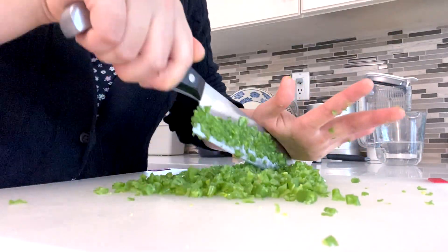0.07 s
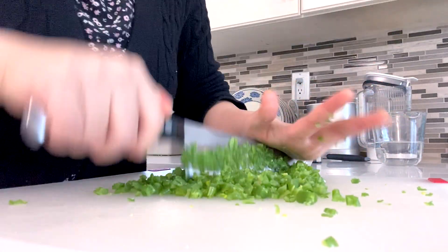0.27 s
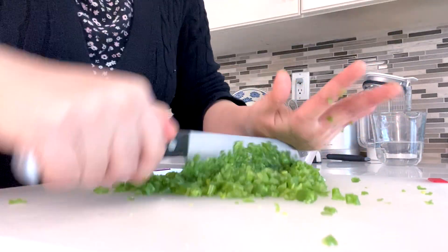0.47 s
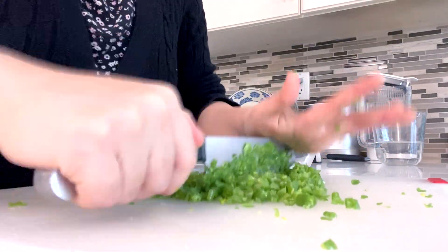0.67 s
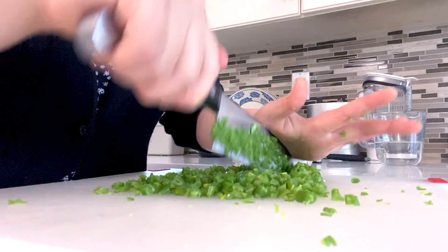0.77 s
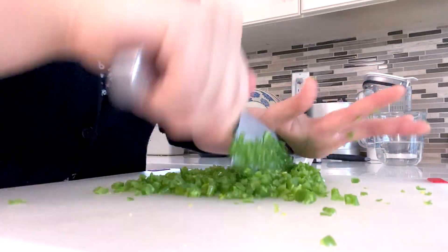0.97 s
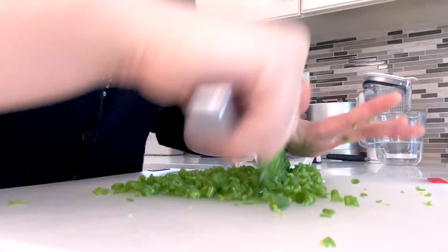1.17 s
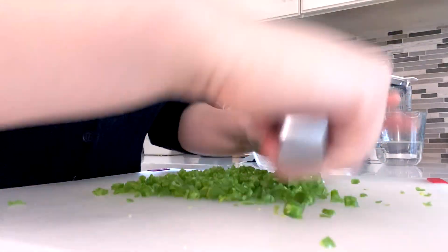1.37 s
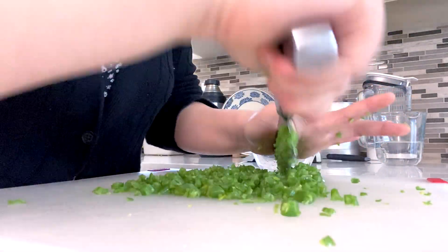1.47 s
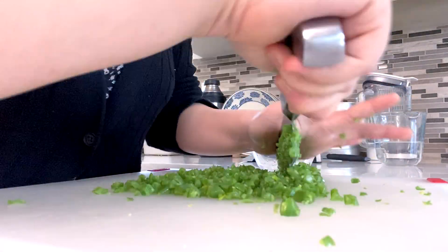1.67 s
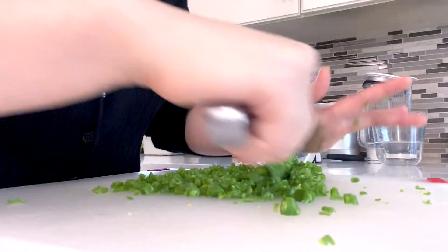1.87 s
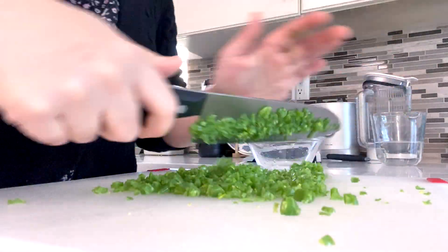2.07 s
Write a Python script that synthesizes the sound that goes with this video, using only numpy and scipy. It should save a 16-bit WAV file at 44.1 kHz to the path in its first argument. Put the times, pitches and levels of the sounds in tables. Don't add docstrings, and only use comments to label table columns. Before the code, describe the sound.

A kitchen knife minces a heap of crisp green vegetables, about four or five strokes a second, each a short crunch into a woody thud, then a board rattle; close microphone, hard tiled kitchen, faint fridge drone.

```python
import sys
import numpy as np
from scipy import signal
from scipy.fft import rfft, irfft, next_fast_len
from scipy.io import wavfile

SR = 44100
rng = np.random.default_rng(int(sys.argv[2]) if len(sys.argv) > 2 else 0)


def unload_wav(signal):
    wavfile.write(
        sys.argv[1],
        SR,
        np.round(np.clip(np.atleast_2d(signal).T, -1, 1) * 32767).astype(np.int16),
    )


def volts_from_decibels(level):
    exponent = np.asarray(level, float) / 20
    return 10 ** exponent


N = 92610
LEAD_S = 0.1
M = N + round(LEAD_S * SR)


def unit(x):
    return x / np.sqrt(np.mean(x ** 2) + 1e-20)


def along(points, hz):
    f, v = np.transpose(points)
    return np.interp(np.log(hz + 1), np.log(f + 1), v)


def filtered(x, response):
    m = next_fast_len(x.shape[-1] + 8192)
    spectrum = rfft(x, m) * response(np.fft.rfftfreq(m, 1 / SR))
    return irfft(spectrum, m)[..., :x.shape[-1]]


def coloured(x, points):
    return unit(filtered(x, lambda hz: volts_from_decibels(along(points, hz))))


def add(track, start_s, sound):
    part = track[..., round(start_s * SR):][..., :sound.shape[-1]]
    part += sound[..., :part.shape[-1]]


def ring(modes, t, rise_s, spread_db, turn):
    hz, db, t60 = np.transpose(modes)[:, :, None]
    luck = rng.standard_normal((3, len(modes), 1))
    shift = turn * luck[1] * np.minimum(hz / 600, 1)
    wave = np.sin(2 * np.pi * hz * (1 + 0.0084 * luck[2]) * t + np.array([shift, -shift]))
    level = volts_from_decibels(db + spread_db * luck[0] - 60 * t / t60)
    return (level * wave).sum(axis=1) * (1 - np.exp(-t / rise_s))


# pitch_hz, level_db
CRACK_SPECTRUM = [(800, -24), (2200, -18.5), (4200, 5.5), (6500, 2.5), (8200, 11), (11000, -12),
                  (15000, -11.5)]


def crack():
    t = np.arange(SR // 20) / SR
    return volts_from_decibels(-60 * t / 0.012) * coloured(rng.standard_normal(len(t)), CRACK_SPECTRUM)


# start_s, thud_db, crunch_length_s, crunch_db, counter_db
STROKES = [(0.2141, 1, 0.052, -17, -18), (.443, 5.5, 0.034, -16.5, -13.5),
           (0.663, -3.5, 0.051, -18.5, -3.5), (0.884, -2, 0.036, -15.5, -3.5),
           (1.099, -2.5, 0.058, -17, -5.5), (1.308, -2, 0.037, -20.5, -5.5), (1.536, -3, 0.03, -18, -5.5),
           (1.754, -1, 0.021, -15, -7)]
# start_s, level_db
SNAPS = [(0.18, -38), (.416, -37), (0.651, -23), (0.863, -28), (0.88, -23), (1.062, -24), (1.071, -21.5),
         (1.523, -34.5)]
# pitch_hz, level_db (per Hz)
CRUNCH_SPECTRUM = [(300, -20.5), (800, 1.5), (1500, -6), (2500, -7), (5000, -20), (8000, -18.5),
                   (12000, -26), (15500, -28.5)]
CRUNCH_RISE_DB, CRUNCH_T60_S = 28, 0.024
GRAINS_PER_S, GRAIN_SPREAD_DB = 5500, 6


def crunch():
    t = np.arange(N) / SR
    present = rng.random(N) < GRAINS_PER_S / SR
    size = volts_from_decibels(GRAIN_SPREAD_DB * np.minimum(rng.exponential(size=N), 2))
    grains = present * size * rng.standard_normal(N)
    level = np.zeros(N)
    for start_s, _, length_s, db, _ in STROKES:
        before = (start_s - t) / length_s
        swell = volts_from_decibels(db - CRUNCH_RISE_DB * before ** 2) * (before < 1.4)
        fade = volts_from_decibels(db - 60 * np.abs(t - start_s) / CRUNCH_T60_S)
        level += np.where(t < start_s, swell, fade)
    out = level * coloured(unit(grains) + 0.5 * rng.standard_normal(N), CRUNCH_SPECTRUM)
    for start_s, db in SNAPS:
        add(out, start_s, volts_from_decibels(db) * crack())
    return out


# pitch_hz, level_db, t60_s
BOARD = [(291.3, -12.5, 0.12), (483.6, -18.5, 0.17), (568.5, -5, 0.059), (613.3, -2.5, 0.13),
         (690, -2.5, 0.26), (749.7, -3.5, 0.15), (813.5, -2, 0.16), (846.3, -3.5, .12), (934, -3, 0.099),
         (997, -1, 0.039), (1207, -3.5, 0.037), (1388, -2.5, 0.056), (1533, -6, 0.034), (2373, -9, .04)]
# pitch_hz, level_db
SLAP_SPECTRUM = [(150, 4.5), (300, 5.5), (430, -14.5), (900, 6.5), (1600, 2), (3000, -5.5), (7000, -21),
                 (16000, -32.5)]
RING_DB, SLAP_DB, SLAP_T60_S, SLAP_RISE_S = -9, 4.5, 0.019, 0.00033


def knock(db, below, below_db, rise_s, spread_s, count):
    t, u = np.arange(SR // 3) / SR, np.arange(SR // 20) / SR
    rings = volts_from_decibels(below_db) * ring(below, t, rise_s, spread_db=4, turn=1.42)
    slaps = np.zeros((2, len(t)))
    jitter = (1 + 0.2 * rng.standard_normal(count)).clip(0)
    for push_s in spread_s * np.arange(count) / count * jitter:
        a, b = rng.standard_normal((2, len(u)))
        sides = np.array([a + 0.33 * b, a - 0.81 * b])
        fade = volts_from_decibels(SLAP_DB - 60 * u / SLAP_T60_S) * (1 - np.exp(-u / SLAP_RISE_S))
        board = volts_from_decibels(RING_DB) * ring(BOARD, t, 0.00033, spread_db=3, turn=0.56)
        add(rings, push_s, board / np.sqrt(count))
        add(slaps, push_s, coloured(sides, SLAP_SPECTRUM) * fade / np.sqrt(count))
    return volts_from_decibels(db) * np.array([rings, slaps])


KNOCK_SEND_DB, TICK_SEND_DB = 10, 8.5
# pitch_hz, level_db, t60_s
COUNTER = [(66.9, 0.5, 0.19), (85, -5, 0.18), (120.1, 3, 0.14), (140.6, 0.5, 0.18), (199.3, -5, 0.19)]


def land_strokes(near, blows):
    for start_s, db, _, _, counter_db in STROKES:
        thud = knock(db, COUNTER, counter_db, rise_s=0.015, spread_s=0.009, count=3)
        add(near, LEAD_S + start_s, thud)
        add(blows, LEAD_S + start_s, volts_from_decibels([db + KNOCK_SEND_DB]))


# pitch_hz, level_db, t60_s
EDGE = [(6550, 8, 0.0046), (8420, -11.5, 0.0067)]
TICK_DB, CRACK_DB, TICK_RISE_S = -3.5, -6.5, 0.0013


def tick(db):
    t = np.arange(SR // 20) / SR
    sharp = volts_from_decibels(CRACK_DB) * crack()
    contact = ring(EDGE, t, TICK_RISE_S, spread_db=1.5, turn=0.23) + sharp
    return volts_from_decibels(db + TICK_DB) * contact * (1 - np.exp(-t / TICK_RISE_S)) ** 2


# start_s, tick_db, knock_db, hollow_db
TICKS = [(0.2170, 3.5, -8, -5), (0.2590, 13, -2, -9.5), (0.4476, 17, 5.5, -23), (0.5000, 11, 2.5, -13),
         (0.5657, -5, -15, -19), (0.6688, 5.5, -1, -16), (0.7168, 12, -0.5, -8.5),
         (0.7710, -6.5, -11.5, -20.5), (0.8886, -2, 2.5, -17), (0.9405, 11.5, -2.5, -8.5),
         (0.9948, -19, -10, -14.5), (1.0735, -30, -4, -27), (1.1015, -36, -2, -10.5),
         (1.1575, 11.5, -3, -6), (1.2095, -5.5, -9.5, -21), (1.3140, 12, -1.5, -8), (1.3685, 9.5, -4, -7.5),
         (1.4174, -8, -12, -14.5), (1.5410, 22, -1.5, -7.5), (1.5905, 9.5, -5, -6), (1.7595, 16.5, -1, -11),
         (-.073, -1, -8, -29), (-.008, -10, -9.5, -15), (0.032, -47, -26, -9)]
# pitch_hz, level_db, t60_s
HOLLOW = [(66, -7.5, 0.19), (145.8, -3, 0.15), (282.3, 4.5, 0.071), (303.8, 0, 0.1), (354, -12.5, 0.35)]


def rattle_board(near, blows):
    for start_s, tick_db, knock_db, hollow_db in TICKS:
        at_s = LEAD_S + start_s
        add(near[1], at_s - 0.0006, tick(tick_db + 3.5))
        add(near, at_s + 0.0005, knock(knock_db - 3, HOLLOW, hollow_db, rise_s=0.0019, spread_s=0, count=1))
        add(blows, at_s, volts_from_decibels([tick_db + TICK_SEND_DB]) + volts_from_decibels(knock_db + KNOCK_SEND_DB - 16.5))


# pitch_hz, t60_s
ROOM = [(100, 0.22), (700, 0.53), (3000, 0.4), (8000, 0.42), (12000, 0.49), (16000, 0.27)]
# pitch_hz, level_db
ROOM_COLOUR = [(60, -6.5), (300, -1.5), (430, 0.5), (750, -1), (1500, 2), (3000, 0), (7000, -1.5),
               (12000, -12.5)]


def kitchen(x):
    out = np.zeros((2, M))
    for start in range(0, M, SR // 20):
        hz, t, z = signal.stft(rng.standard_normal((2, SR // 2)), SR, nperseg=256)
        decay = volts_from_decibels(-60 * t / along(ROOM, hz)[:, None])
        tail = signal.istft(z * decay, SR, nperseg=256)[1]
        tail[1] = 0.14 * tail[0] + 0.84 * tail[1]
        tail *= 1 - np.exp(-np.arange(tail.shape[1]) / SR / 0.0021)
        tail = tail / np.linalg.norm(tail[0])
        add(out, start / SR, signal.fftconvolve(x[None, start:start + SR // 20], tail, axes=1))
    return filtered(out, lambda hz: volts_from_decibels(along(ROOM_COLOUR, hz)))


# pitch_hz, level_db (per Hz)
HUSH_SPECTRUM = [(40, -19), (150, -0.5), (450, -10.5), (700, -12.5), (1200, -17), (3000, -37), (7500, -42),
                 (9500, -66.5)]
HUSH_DB, HUM_DB, HUM_HZ, HUM_WIDTH_HZ = -38.5, -39.5, 64, 29


def hush():
    drone = filtered(rng.standard_normal(N), lambda hz: 1 / (1 + ((hz - HUM_HZ) / HUM_WIDTH_HZ) ** 2))
    air = coloured(rng.standard_normal((2, N)), HUSH_SPECTRUM)
    return volts_from_decibels(HUSH_DB) * air + volts_from_decibels(HUM_DB) * unit(drone)


# pitch_hz, level_db
HEARD = [(300, -8.5), (900, -7.5), (2000, -8), (4000, -8.5), (6500, -6), (8200, -7.5), (13000, -15.5),
         (14500, -21.5)]
ROOM_DB, RING_SEND_DB = -2.5, -1
LEFT_LEAD_S, RIGHT_DB = 0.0001733, 2


def scene():
    near, blows = np.zeros((2, 2, M)), np.zeros(M)
    near[0] += np.pad(crunch(), (M - N, 0))
    land_strokes(near, blows)
    rattle_board(near, blows)
    sides = np.array([[1], [-1]])
    direct = filtered(near.sum(axis=0), lambda hz: np.exp(1j * np.pi * hz * LEFT_LEAD_S * sides))
    walls = filtered(blows, lambda hz: volts_from_decibels(along(HEARD, hz)))
    sent = volts_from_decibels(RING_SEND_DB) * near[0].mean(axis=0) + walls
    both = (direct + volts_from_decibels(ROOM_DB) * kitchen(sent))[:, M - N:]
    return both * volts_from_decibels([[0], [RIGHT_DB]]) + hush()


def band_limit(x):
    return signal.sosfilt(signal.butter(12, 15680, fs=SR, output="sos"), x)


# pitch_hz, level_db
MIC = [(25, -14), (55, 0), (8300, 0), (8800, -13), (9800, -17), (10500, 0), (13300, -1), (14300, -10)]
CLIP_TOP, CLIP_HARD = 1.0, 14.0


def record(dry):
    mic = filtered(dry, lambda hz: volts_from_decibels(along(MIC, hz)))
    clipped = mic / (1 + np.abs(mic / CLIP_TOP) ** CLIP_HARD) ** (1 / CLIP_HARD)
    return band_limit(clipped)


dry = scene()
out = record(dry)
unload_wav(out)
```